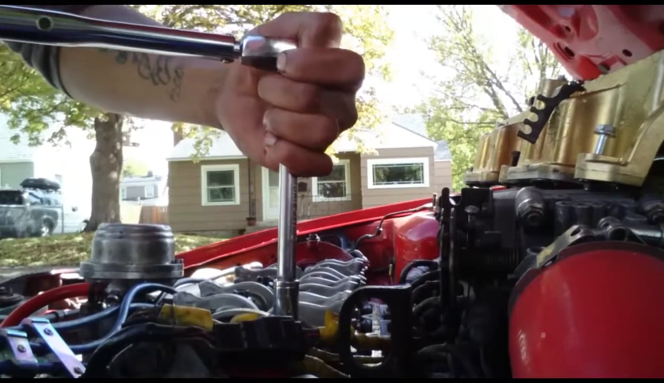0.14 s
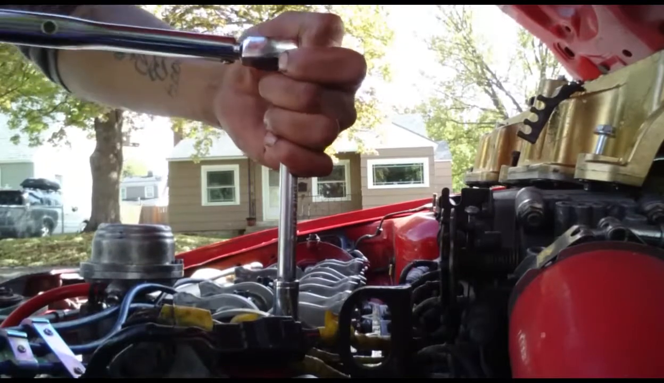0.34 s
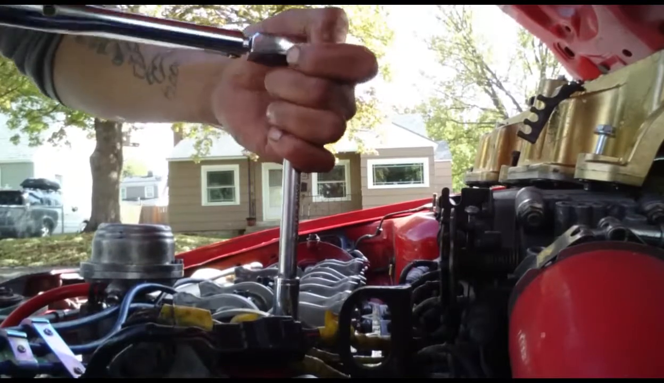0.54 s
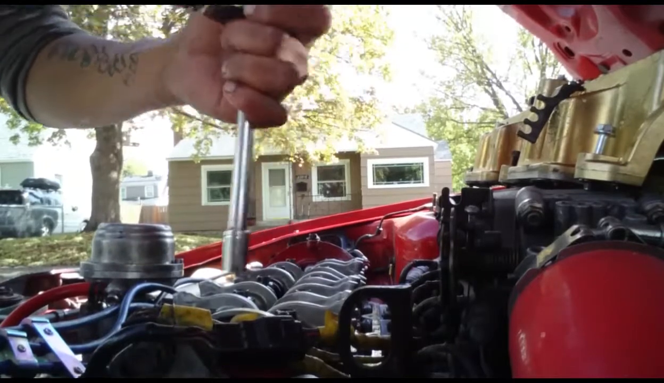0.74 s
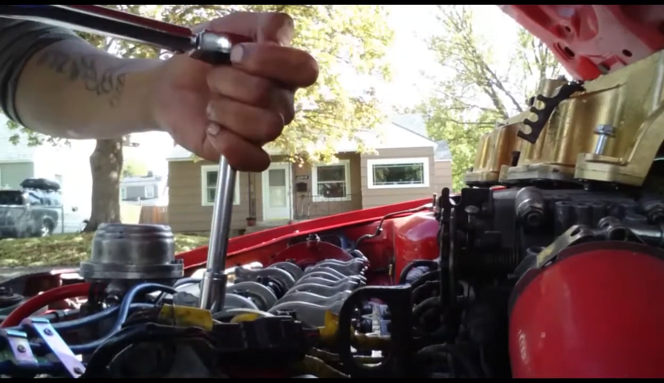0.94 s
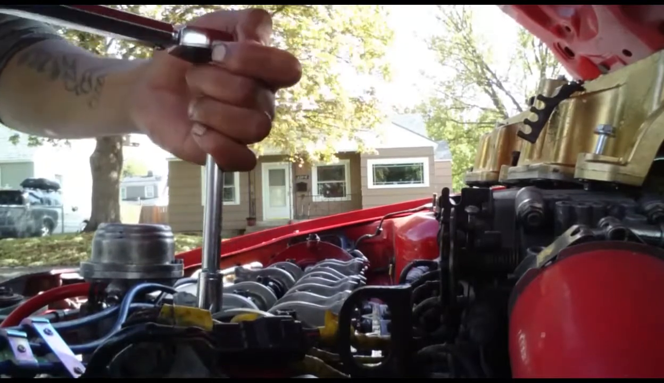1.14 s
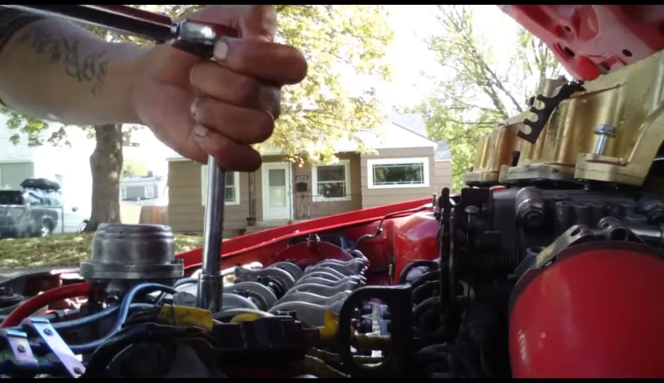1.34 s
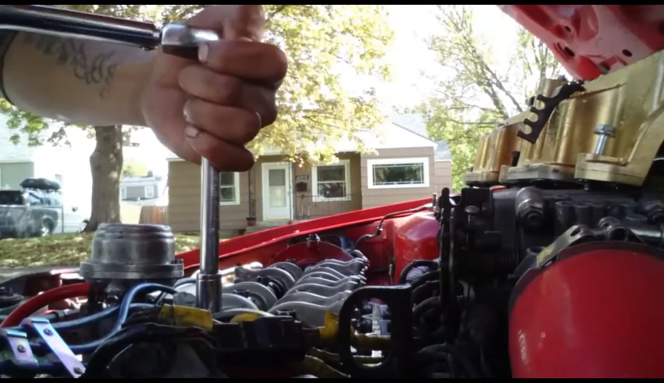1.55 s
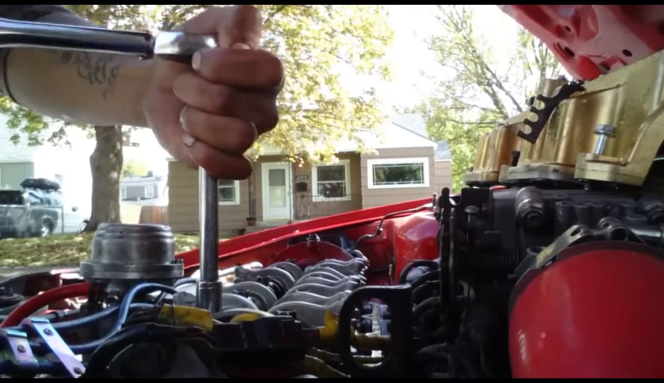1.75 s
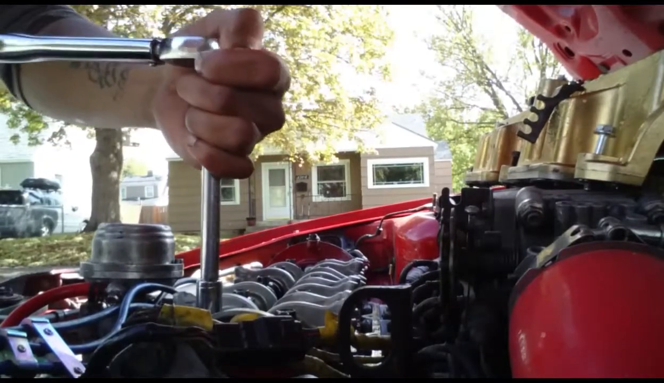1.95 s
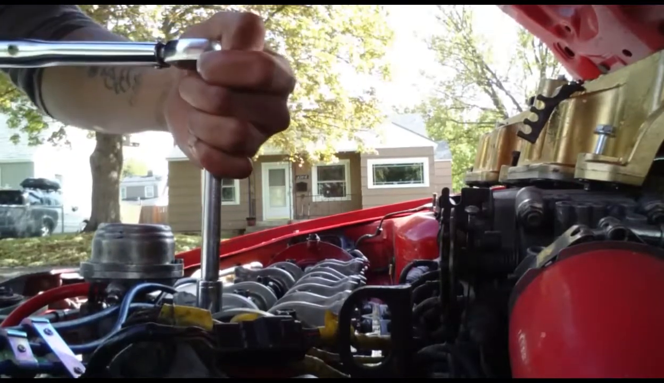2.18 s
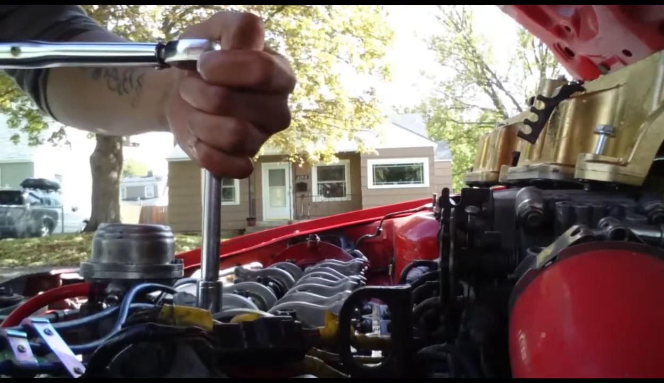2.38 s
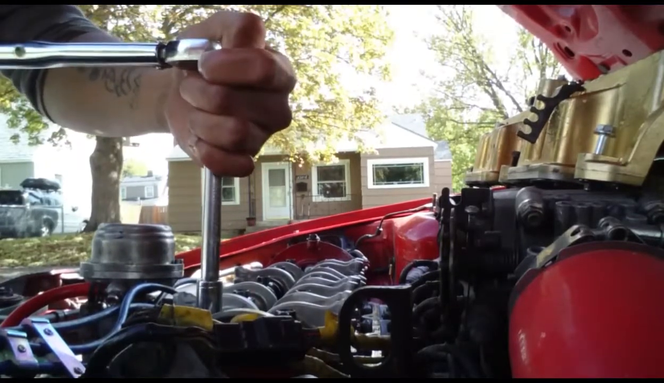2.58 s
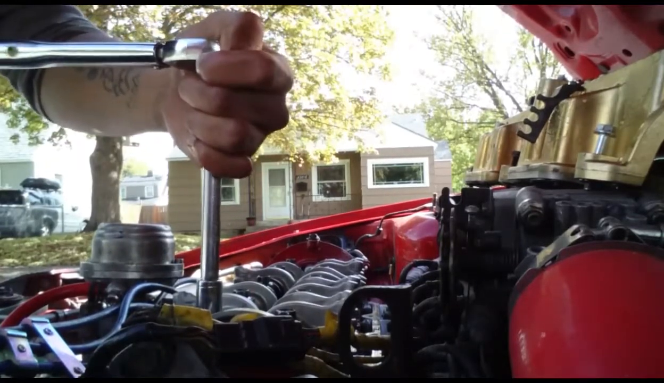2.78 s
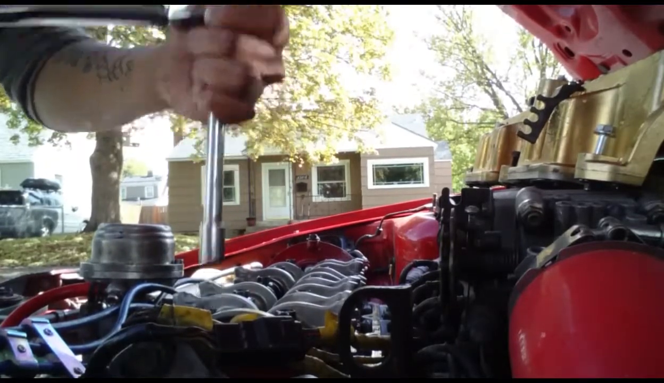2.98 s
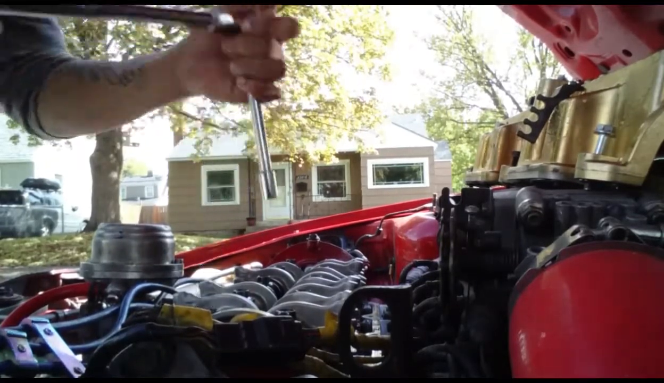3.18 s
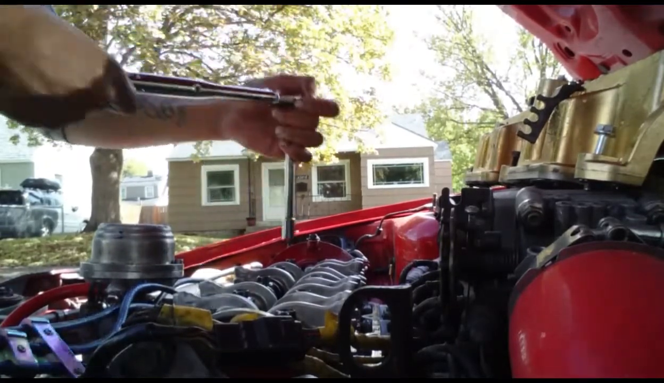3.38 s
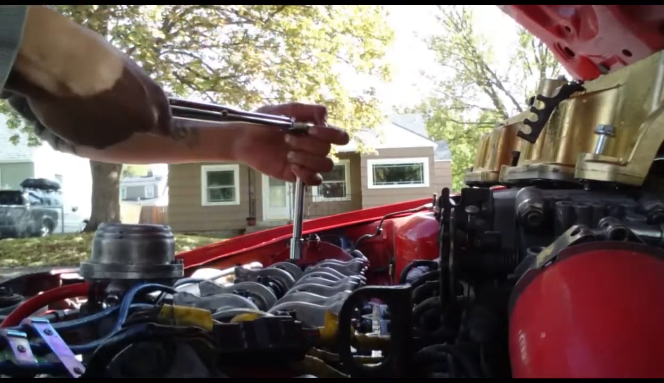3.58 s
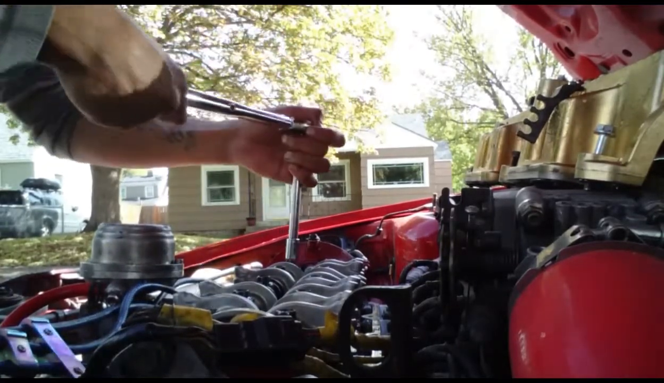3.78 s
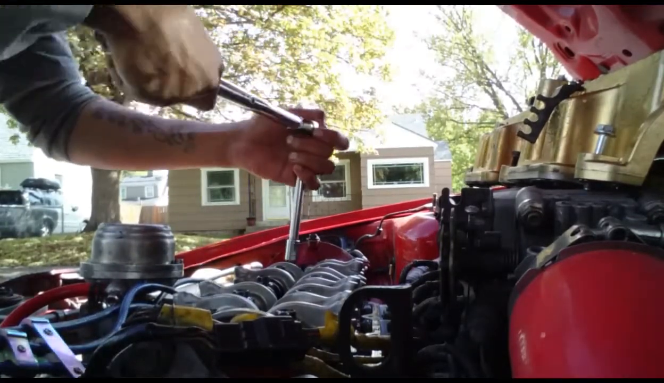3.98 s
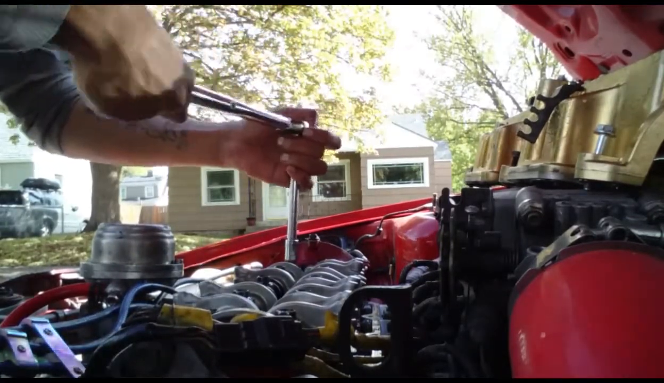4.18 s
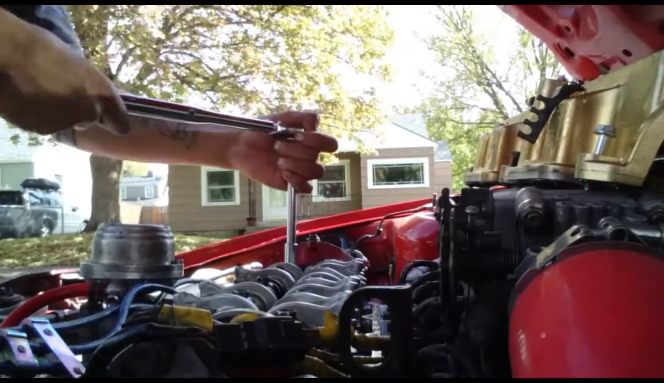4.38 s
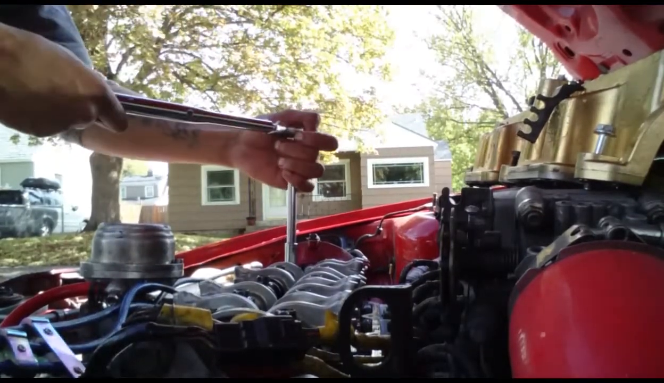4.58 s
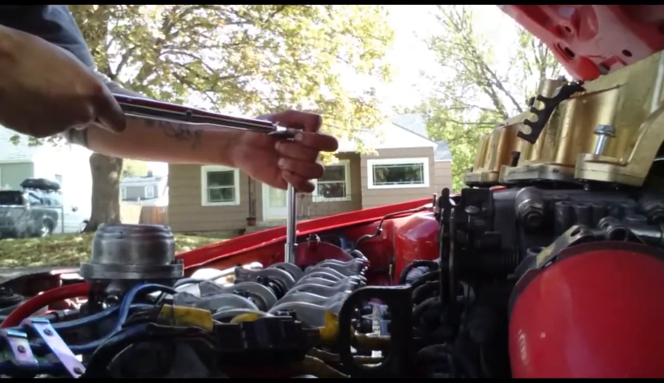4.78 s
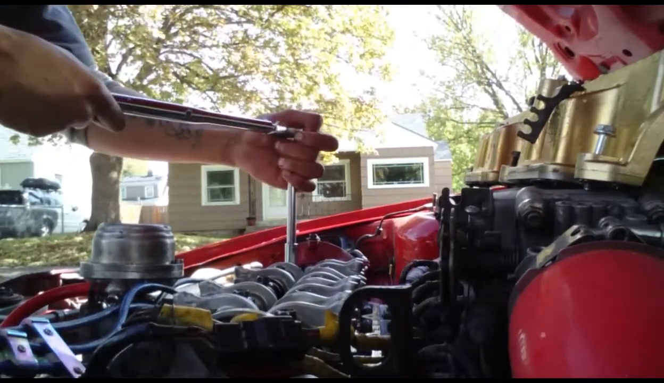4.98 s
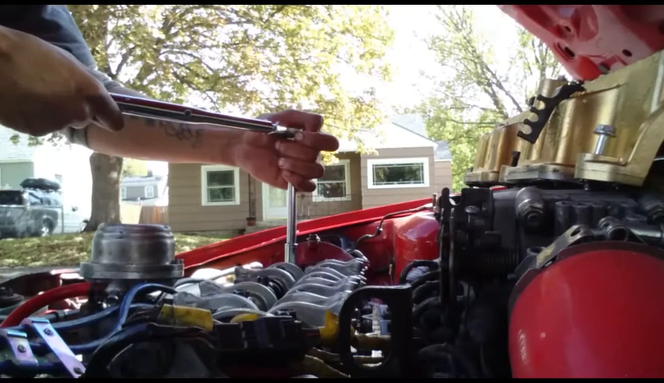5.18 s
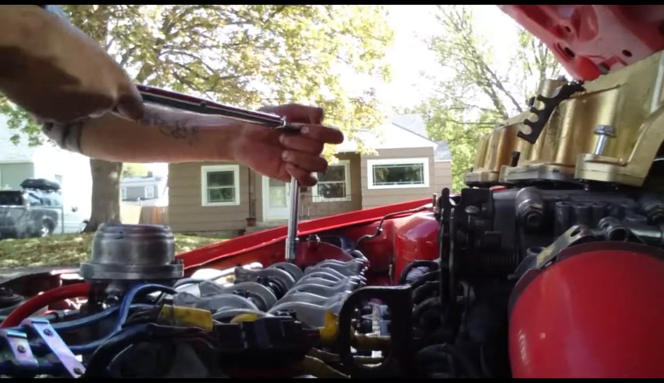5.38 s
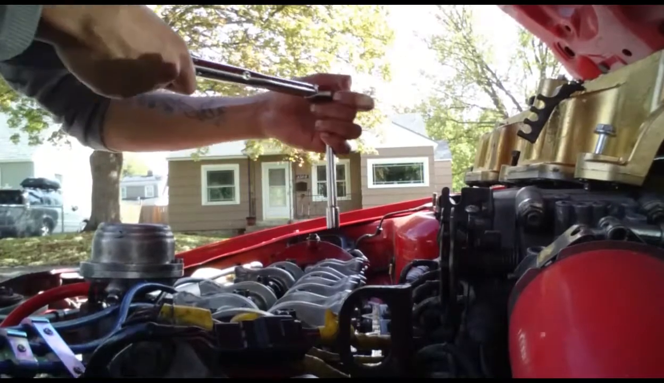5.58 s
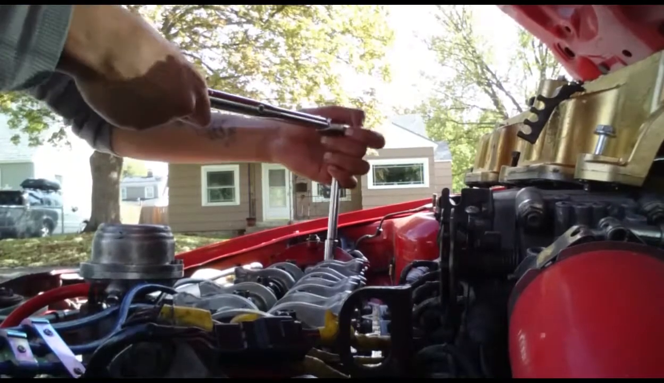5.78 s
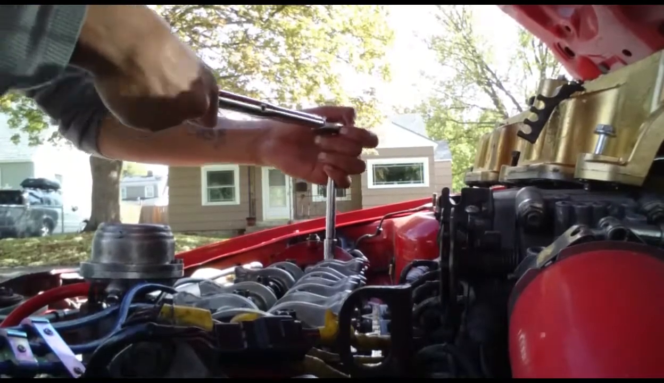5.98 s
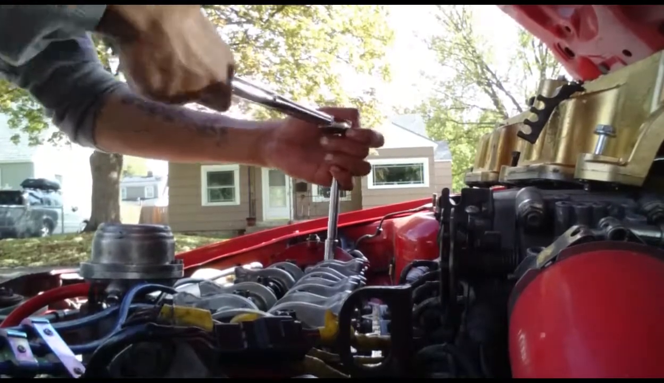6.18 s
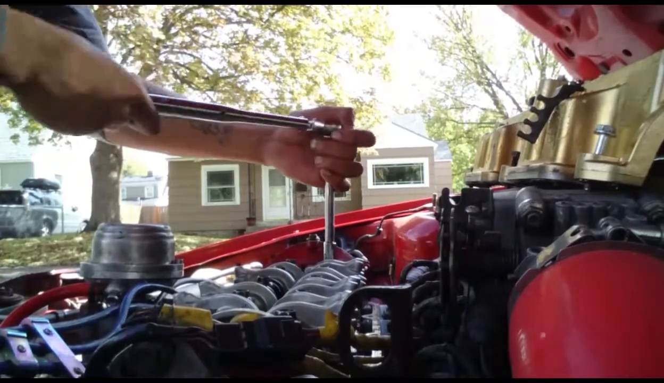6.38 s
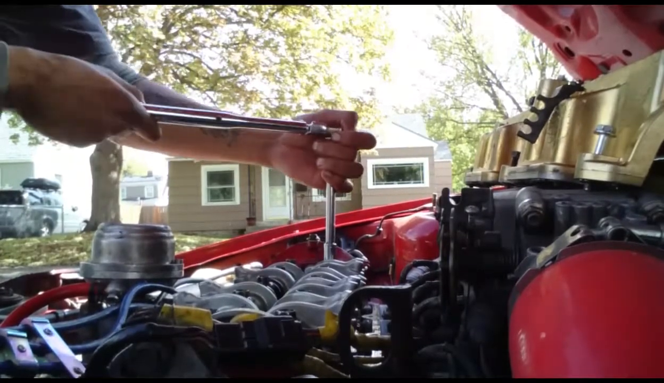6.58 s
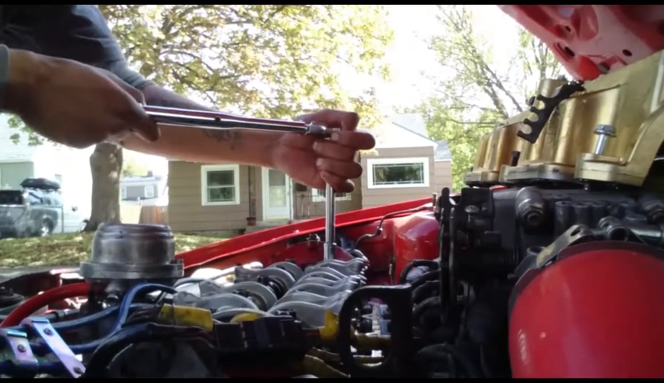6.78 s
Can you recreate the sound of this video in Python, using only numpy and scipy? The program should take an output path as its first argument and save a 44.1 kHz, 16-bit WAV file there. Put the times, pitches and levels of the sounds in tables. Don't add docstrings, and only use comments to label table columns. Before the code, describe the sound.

Close to an open engine bay on a quiet street, a torque wrench breaks with a hard steel crack, then resets with a second click. Small socket taps follow as it moves to the next bolt. Four breaks occur, most answered by a reset, with brief metallic ringing and faint outdoor echoes. Far vehicles rumble, leaves rustle softly, and a small stereo camera microphone adds thin hiss and tiny ticks, mostly on the right.

```python
import sys
import numpy as np
from scipy import signal
from scipy.fft import rfft, irfft, next_fast_len
from scipy.io import wavfile
from scipy.ndimage import uniform_filter1d, map_coordinates

SR = 44100
rng = np.random.default_rng(int(sys.argv[2]) if len(sys.argv) > 2 else 0)


def put_to_file(sound):
    columns = np.atleast_2d(sound).T
    safe = np.clip(columns, -1, 1)
    whole_steps = np.round(safe * 32767)
    wavfile.write(sys.argv[1], SR, whole_steps.astype(np.int16))


def boost_factor(decibels):
    exponent = np.asarray(decibels, float) / 20
    return 10 ** exponent


N = 301624


def rms_one(x):
    return x / np.sqrt(np.mean(x ** 2) + 1e-30)


def at_hz(points, hz):
    points = np.array(points)
    return np.interp(np.log(hz), np.log(points[:, 0]), points[:, 1])


def drift(rate):
    knots = rng.standard_normal(400)
    return map_coordinates(knots, [np.arange(N) / SR * rate], order=3)


def resonate(x, peaks):
    out = np.zeros(N)
    for k, (hz, width, db) in enumerate(peaks):
        r = np.exp(-np.pi * width / SR)
        feed = [(1 - r * r) / 2, 0, (r * r - 1) / 2]
        back = [1, -2 * r * np.cos(2 * np.pi * hz / SR), r * r]
        out += (-1) ** k * boost_factor(db) * signal.lfilter(feed, back, x + 1e-18)
    return out


def ring(clicks, hz, t60):
    r, w = boost_factor(-60 / (t60 * SR)), 2 * np.pi * hz / SR
    return signal.lfilter([0, np.sin(w)], [1, -2 * r * np.cos(w), r * r], clicks + 1e-18)


def left_right(left_db, right_db):
    return boost_factor(np.array([[left_db], [right_db]]))


# frequency in Hz, left-right likeness from -1 to 1.
LIKENESS = [(60, .76), (130, 0.54), (280, 0.29), (600, .06), (1300, 0.05), (13000, -0.29)]
# frequency in Hz, left minus right in dB.
LEAN = [(60, -5.5), (110, -6), (220, -1), (360, -5), (700, -6.5), (1200, -1), (3000, -1.04), (13000, -4)]


def outdoor_noise(spectrum):
    size = next_fast_len(N)
    hz = np.maximum(np.arange(size // 2 + 1) * SR / size, 1)
    mid, side = rfft(rng.standard_normal((2, size)))
    alike = np.clip(at_hz(LIKENESS, hz), -1, 1)
    pair = np.sqrt(1 + alike) * mid + np.sqrt(1 - alike) * side * [[1], [-1]]
    gain = boost_factor(at_hz(spectrum, hz) + at_hz(LEAN, hz) * [[.5], [-.5]])
    return rms_one(irfft(pair * gain, size)[:, :N])


# closest moment in seconds, tyre level in dB, engine level in dB,
# time to double the squared distance in seconds.
PASSES = [
    (1.3, -67.5, -69, .6),
    (2.5, -74, -66, 1.4),
    (3.65, -65.5, -71, 0.4),
    (4.5, -70.5, -71.5, 0.18),
    (5.88, -72.5, -70, .2),
]


def passing(column, floor_db):
    t = np.arange(N) / SR
    power = np.full(N, boost_factor(floor_db) ** 2)
    for row in PASSES:
        power += boost_factor(row[column]) ** 2 / (1 + ((t - row[0]) / row[3]) ** 2)
    return np.sqrt(power)


# frequency in Hz, level in dB per Hz.
RUMBLE = [(15, -56.5), (28, -28), (42, -18), (54, -1.5), (75, 1), (123, -4.5), (450, -19), (990, -120)]


def far_rumble():
    return passing(column=2, floor_db=-70.5) * boost_factor(1.6 * drift(12.0)) * outdoor_noise(RUMBLE)


# frequency in Hz, level in dB per Hz.
TRAFFIC = [(400, -19.5), (480, -9.5), (570, -1), (660, -5), (930, -2.17), (1160, -3.5), (1400, -13.5),
           (2000, -28)]


def far_tyres():
    return passing(column=1, floor_db=-84) * boost_factor(1.3 * drift(4.8)) * outdoor_noise(TRAFFIC)


def with_house_echo(steady_db, echo_db):
    t60_s, rise_s = 2, .04
    power = np.full(N, boost_factor(steady_db) ** 2)
    for s, db, *_ in BREAKS + RESETS:
        since = np.maximum(np.arange(N) / SR - s, 0)
        power += (boost_factor(db + echo_db - 60 * since / t60_s) * (1 - np.exp(-since / rise_s))) ** 2
    return np.sqrt(power)


# frequency in Hz, level in dB per Hz.
AIR = [(250, -6), (450, -1), (1300, 2), (3000, 1.5), (4000, -0.5), (6000, -11), (8000, -17.5),
       (14000, -27.5)]


def air_in_trees():
    gain = with_house_echo(steady_db=-74.5, echo_db=-69)
    return gain * boost_factor(6.0 + 1.2 * drift(13.0)) * outdoor_noise(AIR)


def drone():
    phase = 2 * np.pi * np.cumsum(73 + 6.5 * drift(0.99)) / SR
    hum = drift(38.0) * np.cos(phase) + drift(25.0) * np.sin(phase)
    return boost_factor(-75.5) * hum * left_right(-6.0, 0)


# frequency in Hz, width in Hz, level in dB.
PORT = [
    (9318, 1400, 0),
    (12200, 2000, 1.3),
]


def through_port(x):
    return rms_one(resonate(resonate(x, PORT), PORT))


def port_hiss():
    gain = with_house_echo(steady_db=-77.5, echo_db=-61.5)
    return gain * boost_factor(1.5 + .7 * drift(3.3)) * through_port(rng.standard_normal(N))


def frame_ticks():
    first_s, frame_hz = .0098, 60
    at = (np.arange(first_s, N / SR - .001, 1 / frame_hz) * SR).astype(int)
    pulses = np.zeros(N)
    pulses[at] = boost_factor(rng.normal(0, 3.0, len(at))) * rng.choice([-1, 1], len(at))
    return boost_factor(-77) * through_port(pulses)


def camera_noise():
    return (port_hiss() + frame_ticks()) * left_right(-21.5, 0)


TAIL, LEAD = 12288, 200


def engine_bay(x, bay_t60, bay_db, street_t60, street_db):
    sample = np.arange(TAIL)
    t = sample / SR
    close = rms_one(boost_factor(-60 * t / bay_t60)) * boost_factor(bay_db)
    far = rms_one(boost_factor(-60 * t / street_t60)) * boost_factor(street_db)
    echoes = rng.standard_normal((2, TAIL)) * np.hypot(close, far) / np.sqrt(TAIL)
    echoes[:, 0] = 1
    heard = rfft(np.roll(x, LEAD), TAIL) * rfft(echoes)
    power = np.abs(heard) ** 2
    even = np.mean(power, axis=1, keepdims=True) / uniform_filter1d(power, size=260)
    fade_in = np.clip((sample - LEAD + 10) / 20, 0, 1)
    fade_out = np.clip((TAIL - 1500 - sample) / 4000, 0, 1)
    return irfft(heard * np.sqrt(even), TAIL) * fade_in * fade_out


# start in seconds,
# peak level in dB, chatter in ms, brightness in dB, left minus right in dB.
BREAKS = [
    (0.319, -7.5, 5.3, 10, 4.5),
    (0.325, -21, 1.6, 26.5, 7.5),
    (0.33, -29.5, 3.5, 15, -7),
    (2.6285, -6.5, 3, -3.5, -2.5),
    (2.634, -10, 2.46, 3, 3.3),
    (4.327, -8.5, 3.14, -3, -1),
    (5.175, -7.5, 2.8, 3, -0.4),
    (5.182, -20.5, 7, -2, 2.5),
]
RESETS = [(0.5087, -5.5, 2.7, 1.5, 0), (0.513, -28, 2.4, -2, -5), (0.6216, -34.5, 2, -2, -6.5),
          (0.639, -47, 3.2, 4.5, -1), (2.858, -11.5, 3.0, 3.5, 5.5), (2.864, -19.5, 3.9, -9, -12),
          (2.9764, -33, 2.1, -12, -8), (2.996, -41.5, 6.7, -10.5, -5.5), (5.3551, -12, 3.87, 0, -0.15),
          (5.36, -16, 3.2, -1, 6.5), (5.43, -34, 3.4, -15, -8.5), (5.462, -36.5, 5.1, -2, 0)]
SOCKET = [(0.954, -26, 7.3, 7.5, 7.5), (0.96, -34, 6.9, 5.5, -15), (1.350, -44.5, 1.7, 3.5, -0.3),
          (1.7425, -38.5, 3.8, -14, 2.5), (1.754, -47, 2.7, -11, -13), (1.763, -24.5, 2.2, 0.1, 2.5),
          (1.771, -35, 1.4, 0, 6), (3.218, -49, 13.4, -9, -4.5), (3.602, -27.5, 8.1, 3.5, 1.7),
          (3.957, -56.5, 6, -11, -4), (3.965, -29, 6, 6, 4.5), (3.975, -26, 6, -10, 0.1),
          (4.321, -35.5, 5.1, -10.5, -22), (4.392, -46, 7.1, -13, -1), (5.756, -55, 5, 1, -5),
          (5.813, -29, 8.5, 8, 2), (5.82, -22, 5, 6, 7), (5.862, -47, 11, -6.5, 1),
          (6.226, -52, 4.8, -14, -8), (6.446, -57, 4.5, -5.5, -5), (6.479, -53.5, 8.9, -9, 3),
          (6.493, -42.5, 6.2, -8, -4.5)]
# level in dB, share of the contact's dB that it follows.
MASS = [
    (9.5, 1.6),
    (2.5, 0.8),
    (-2, 0.67),
]
# bay t60 in seconds, bay level in dB, street t60 in seconds,
# street level in dB.
SCATTER = [
    (.06, -4, 0.69, -29.5),
    (0.021, 1.5, 0.18, -25.5),
    (0.088, 4, .25, -22.5),
]
# frequency in Hz, width in Hz, level in dB.
BODY = [
    [(1790, 620, -23.5), (2720, 1900, -2), (3520, 880, 4), (4146, 755, 5.5), (5491, 1700, -18)],
    [(1910, 700, -9.5), (2980, 410, -1), (3800, 900, -4.5), (5400, 520, -14.5), (6240, 1100, -17)],
]
BRIGHT = [
    [(7650, 2900, -13), (10200, 3400, -15), (13563, 730, -21.5)],
    [(7565, 2300, -20), (9174, 1285, -6.5), (11478, 3100, -8.5)],
]
WEIGHT = [
    [(148.7, 220, -26.5), (495, 300, -19.5), (1065, 280, 0.5), (1510, 640, -2.5)],
    [(120.5, 36, -10), (450, 600, -2), (854, 300, 0.5), (1289, 400, -0.55)],
]


def steel_contacts():
    burst, first = 2000, 35
    layers = np.zeros((3, 2, N + TAIL))
    kinds = zip((BREAKS, RESETS, SOCKET), MASS)
    rows = sorted(row + mass for kind, mass in kinds for row in kind)
    chance = rng.random((len(rows), 3, burst))
    t_ms = np.maximum(np.arange(burst) / SR * 1000, 1e-6)
    for row, (when, size, sign) in zip(rows, chance):
        s, db, chatter_ms, bright_db, pan_db, mass_db, follows = row
        swell = (1 - np.exp(-t_ms / (0.26 * chatter_ms))) * np.exp(-(t_ms / chatter_ms) ** 1.6)
        swell[-LEAD:] = 0
        blows = (when < .3) * boost_factor(-6.0 * np.log(size + 0.056)) * np.sign(sign - .5) * swell
        blows[first] += 3.6 * np.sqrt(np.mean(blows[:int(chatter_ms * SR / 1000)] ** 2))
        blows = blows / np.sqrt(np.sum(blows ** 2) / np.sum(swell ** 2)) * boost_factor(db + 6.5)
        push = (np.arange(burst) == first) * boost_factor(mass_db + follows * db)
        start = int((s - .0008) * SR) - LEAD
        forces = blows, blows * boost_factor(bright_db), push
        for layer, force, paths in zip(layers, forces, SCATTER):
            layer[:, start:start + TAIL] += engine_bay(force, *paths) * left_right(pan_db / 2, -pan_db / 2)
    out = np.zeros((2, N))
    for layer, peaks in zip(layers, (BODY, BRIGHT, WEIGHT)):
        for side in (0, 1):
            out[side] += resonate(layer[side, :N], peaks[side])
    return out


# start in seconds, level in dB,
# frequency in Hz, t60 in seconds.
JOLTS = [(0.33, -20, 75.5, 0.05), (0.32, -21.5, 360, 0.029), (0.3195, -21, 560, .025),
         (0.321, -22, 810, .015), (2.861, -37, 780, .025), (0.956, -44.5, 416, 0.02),
         (0.322, -27.5, 230, 0.034), (0.53, -41, 416, 0.033), (1.766, -33, 660, 0.028),
         (2.628, -46.5, 100, 0.06), (2.7, -46, 59, 0.2), (2.76, -46, 94, 0.21), (4.336, -53.5, 166.7, 0.68),
         (4.26, -53.5, 49, 0.5), (5.178, -48, 220, 0.027), (5.870, -48.5, 740, 0.069)]


def jolts():
    out = np.zeros(N)
    for s, db, hz, t60 in JOLTS:
        click = np.zeros(N)
        click[int(s * SR)] = boost_factor(db)
        out += ring(click, hz, t60)
    return out * left_right(-18.0, 0) * [[-1], [1]]


# start in seconds, handle tube level in dB,
# bar bend level in dB, socket wall level in dB.
RINGS = [(0.320, -64, -47, -62), (0.509, -68, -53, -58), (0.957, -76, -62, -64), (1.764, -80, -58, -68),
         (2.629, -43, -49, -56), (2.859, -68, -51, -56), (3.603, -76, -68, -66), (3.968, -76, -60, -62),
         (4.329, -70, -39.5, -47), (5.175, -49.5, -56, -50), (5.360, -68, -39, -45), (5.818, -72, -54, -58)]
# part of the tool (1 tube, 2
# bar, 3 socket), frequency in Hz, level in dB, t60 in seconds, right minus left in dB, left lag in ms.
LONG_MODES = [(1, 5464, 0, .3, -13, .05), (1, 4420, -14, .25, -9, .1), (1, 6013, -5.5, .45, -4, .11),
              (1, 6001, -9, .4, -4, .11), (1, 7434, -15, .5, -2, .09), (1, 7650, -20, .3, 2, .2),
              (1, 9055, -19, .16, 2, .3),
              (2, 1356, -8, .36, 8, .24), (2, 1384, -11, .12, 8, .24),
                        (2, 1895, -3, .14, -12, .19), (3, 2590, 1, .15, -10, .25),
                        (3, 2860, -1, .13, 2, .1), (3, 3165, 8, .14, -2, .2), (3, 3420, 1, .16, -4, .05),
                        (3, 3720, -3, .12, -5, .15), (3, 4690, -2, .14, -8, .3)]


def tool_ring():
    out, blows = np.zeros((2, N)), np.array(RINGS)
    for part, hz, db, t60, right_db, lag_ms in LONG_MODES:
        clicks = np.zeros(N)
        clicks[(blows[:, 0] * SR).astype(int)] = boost_factor(blows[:, part] + db)
        tone = ring(clicks, hz, t60)
        out += [np.roll(tone, round(lag_ms * SR / 1000)), tone * boost_factor(right_db)]
    return out


def scene():
    street = far_rumble() + far_tyres() + air_in_trees() + drone()
    camera = camera_noise()
    tool = steel_contacts() + jolts() + tool_ring()
    tool = signal.sosfilt(signal.butter(2, 45.0, "high", fs=SR, output="sos"), tool)
    return tool + street + camera


def roll_off(x):
    return signal.sosfilt(signal.butter(12, 13780, fs=SR, output="sos"), x)


def record(dry):
    cut = signal.sosfilt(signal.cheby2(10, 45, 13900, fs=SR, output="sos"), dry)
    rounded = .97 * np.tanh(cut / .7)
    return roll_off(rounded)


dry = scene()
out = record(dry)
put_to_file(out)
```